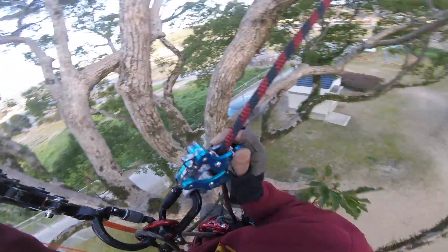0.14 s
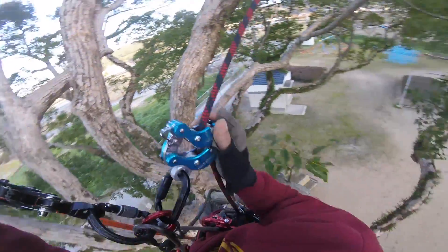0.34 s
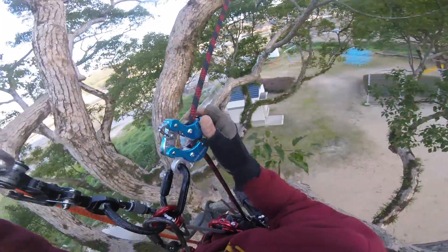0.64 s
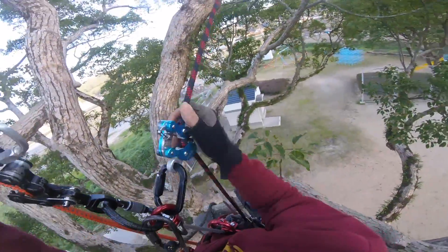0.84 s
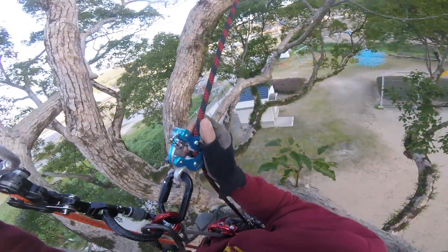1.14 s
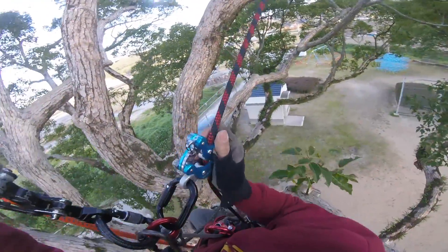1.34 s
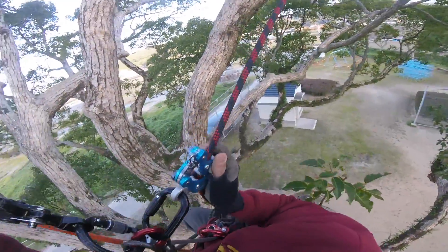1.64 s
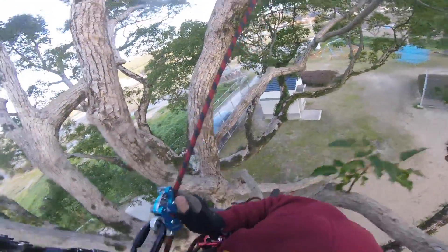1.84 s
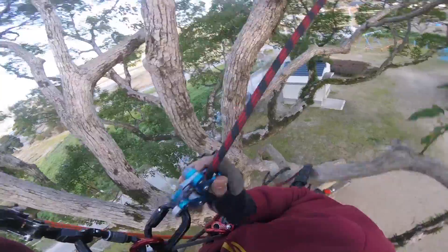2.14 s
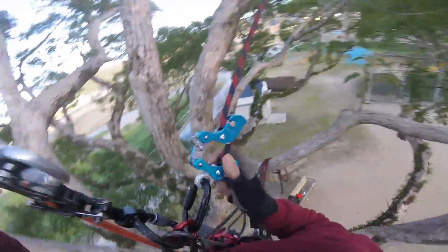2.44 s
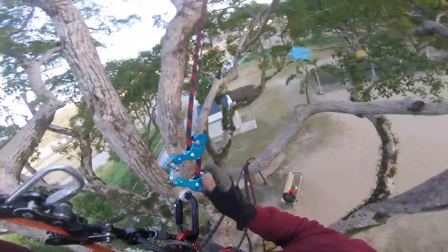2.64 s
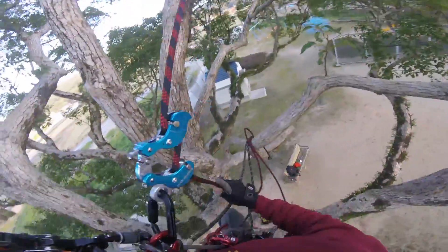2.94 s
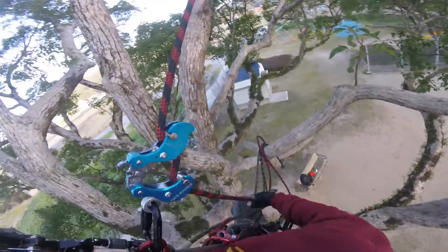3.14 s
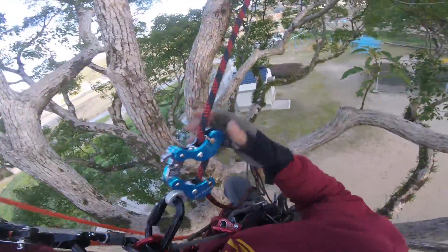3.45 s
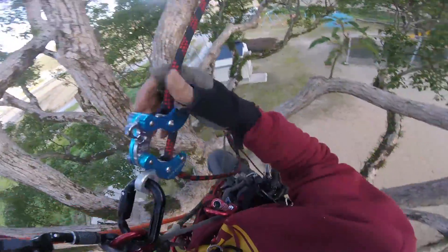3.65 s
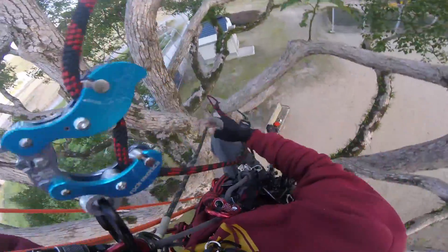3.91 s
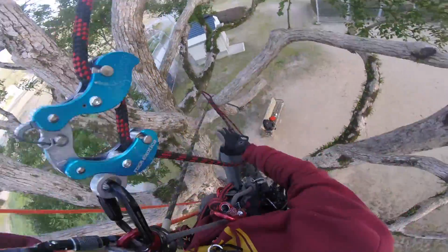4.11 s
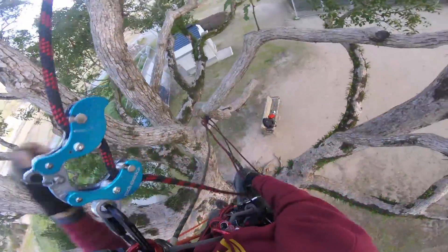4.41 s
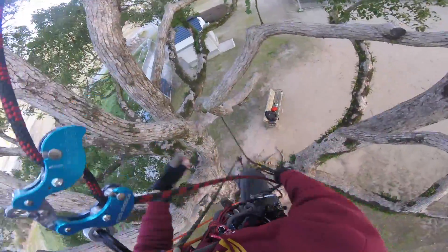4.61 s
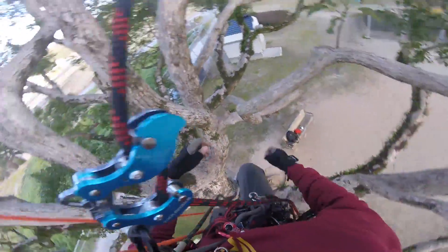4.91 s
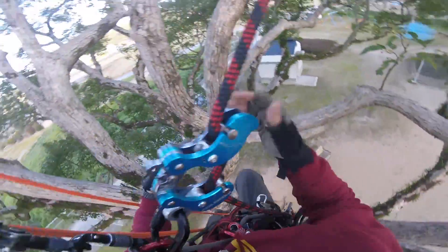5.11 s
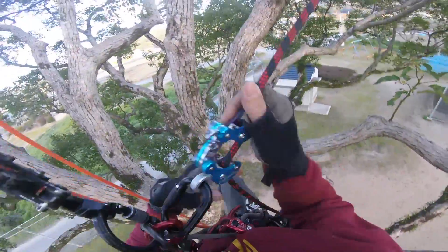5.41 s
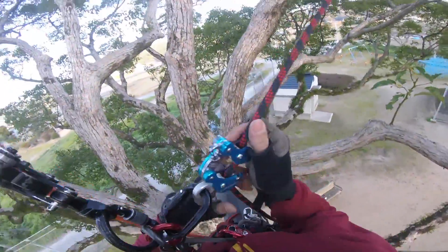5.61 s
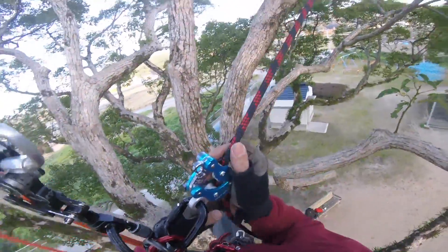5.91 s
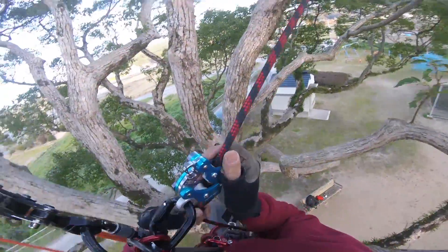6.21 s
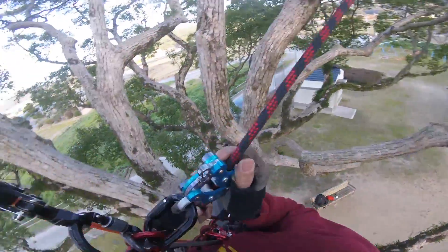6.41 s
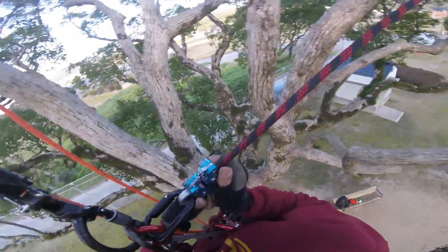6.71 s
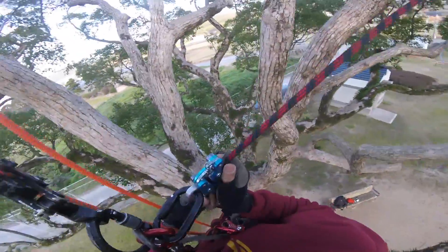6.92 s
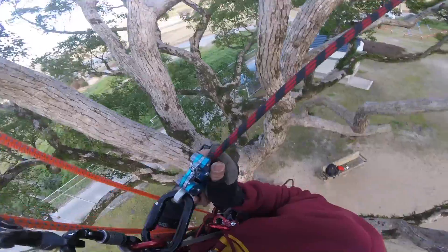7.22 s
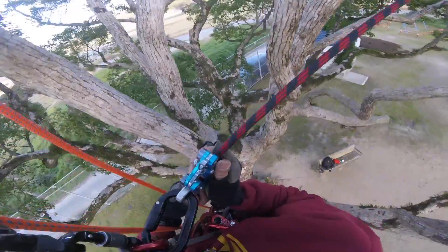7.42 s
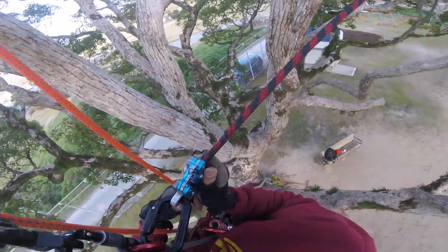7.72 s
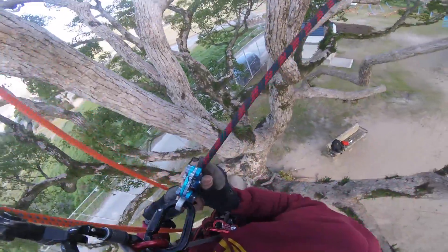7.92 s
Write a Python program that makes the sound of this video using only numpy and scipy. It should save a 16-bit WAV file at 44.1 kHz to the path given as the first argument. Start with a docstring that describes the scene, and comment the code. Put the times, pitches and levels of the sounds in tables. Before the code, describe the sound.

Bright, dry metallic clicks and clattering of carabiners on a climbing rope, with soft cloth and rope rustle, dull knocks and light wind buffeting.

```python
"""A metal rope device and its carabiners click and rattle along a rope, moved by a climber in a tree.
Principle: each contact is an impulse with a brief chatter, exciting damped modes that echo off body and limbs.
Knocks and a strap's stick-slip creak are damped modes too; rope, sleeves and hush are shaped noise.
Wind buffets the microphone of a close, sealed camera as modulated low noise and single-cycle puffs.
The camera's look-ahead limiter ducks everything around the two hardest rattles; a low-pass ends the chain."""
import sys
import numpy as np
from scipy import signal
from scipy.fft import rfft, irfft, next_fast_len
from scipy.io import wavfile
from scipy.ndimage import uniform_filter1d, minimum_filter1d, map_coordinates

SR = 44100
rng = np.random.default_rng(int(sys.argv[2]) if len(sys.argv) > 2 else 0)


def dump(signal):
    """Clip the signal to [-1, 1] and save it as 16-bit WAV at the path in sys.argv[1]."""
    limited = np.clip(np.atleast_2d(signal).T, -1, 1)
    pcm = np.round(limited * 32767).astype(np.int16)
    wavfile.write(sys.argv[1], SR, pcm)


N = 355261  # samples


def amp(db):
    """Logarithmic level: 20 dB is a factor of ten in amplitude."""
    return 10 ** (np.asarray(db) / 20)


def unit(x):
    """Normalisation to a root-mean-square of 1."""
    return x / np.sqrt(np.mean(x ** 2) + 1e-20)


def along(points, hz):
    """Interpolation of (f/Hz, value) points along a logarithmic frequency axis."""
    f, v = np.transpose(points)
    return np.interp(np.log(hz + 1), np.log(f + 1), v)


def wobble(rate):
    """Slow random modulation: a smooth curve through normal random knots, rate knots a second."""
    knots = rng.standard_normal(int(N * rate / SR) + 4)
    return map_coordinates(knots, [np.arange(N) * rate / SR])


def filtered(x, response):
    """Linear filtering: the spectrum of x times a response of frequency."""
    m = next_fast_len(N + 8192)
    spectrum = rfft(x, m) * response(np.fft.rfftfreq(m, 1 / SR))
    return irfft(spectrum, m)[..., :N]


def coloured(x, spectrum):
    """Spectral shaping: x filtered to a given colour, at rms 1."""
    return unit(filtered(x, lambda hz: amp(along(spectrum, hz))))


def curves(rows):
    """Linear interpolation in time: one value a sample for each column after t/s."""
    s, *cols = np.transpose(rows)
    return [np.interp(np.arange(N) / SR, s, c) for c in cols]


def peak(rows):
    """Normalisation of each row to peak 1."""
    return rows / np.abs(rows).max(axis=1, keepdims=True)


def ringing(modes, centre_hz, spread_hz, scatter_db, t):
    """Modal superposition: modes near each blow's centre ring most, slightly detuned by the grip."""
    hz, db, t60 = np.transpose(modes)
    chance = rng.standard_normal((len(centre_hz), 3, len(hz)))
    distance = (hz - centre_hz[:, None]) / spread_hz
    gain = amp(db + scatter_db * chance[:, 0] - 6.36 * distance ** 2)
    detuned_hz = hz * (1 + 0.0184 * chance[:, 1])
    phase = 2 * np.pi * detuned_hz[..., None] * t + 0.467 * chance[:, 2, :, None]
    decay = amp(-60 * t / t60[:, None])
    rows = np.sum(gain[..., None] * decay * np.sin(phase), axis=1)
    rows *= (1 - np.exp(-t / 0.00013)) ** 3  # the contact takes a moment to build
    return peak(rows)


def superposed(rows, start):
    """Superposition: each row is added to the signal from its own start sample."""
    where = start[:, None] + np.arange(rows.shape[1])
    return np.bincount(where.ravel(), rows.ravel(), N + SR)[:N]


# relative spectrum of the outdoor hush: f/Hz, level/dB
HUSH_SPECTRUM = [(120, -25.5), (200, -1), (231, 1), (291, -5), (651, -11.5), (711, -12.5), (1020, -13.5),
                 (1740, -20), (2120, -20), (4170, -28), (5860, -23), (6530, -17.5), (10400, -30),
                 (12600, -30), (14300, -49.5)]


def hush():
    """Random noise principle: filtered random pressure with only a slight drift in level."""
    level_db = -63.5 + 1.3 * wobble(3.06)
    return amp(level_db) * coloured(rng.standard_normal(N), HUSH_SPECTRUM)


# relative spectrum of the wind buffeting: f/Hz, level/dB
BUFFET_SPECTRUM = [(8.8, -38.5), (15, 2), (54, 1.5), (95, -8), (190, -13.5), (222, -29.5), (400, -26.5),
                   (520, -58), (880, -120)]
# wind on the microphone port: t/s, level/dB
WIND_LEVEL = [(0, -54), (.84, -53.5), (1.2, -58), (1.68, -54.5), (2.16, -57), (2.22, -40.5), (2.29, -46.5),
              (2.4, -50), (2.8, -53), (2.94, -47), (3.36, -56.5), (3.52, -52.5), (3.78, -59), (4.6, -56),
              (5.74, -54.5), (6.44, -56), (7.0, -49), (7.42, -44), (7.7, -47.5), (8.06, -56)]


def wind_buffet():
    """Turbulent pressure fluctuation: low noise in random lumps follows the wind level."""
    (level_db,) = curves(WIND_LEVEL)
    lumps = amp(1.83 * wobble(14))
    return amp(level_db) * unit(lumps * coloured(rng.standard_normal(N), BUFFET_SPECTRUM))


# relative spectrum of cloth rub: f/Hz, level/dB
RUB_SPECTRUM = [(150, -28), (300, -1), (580, -3), (950, -3.5), (1500, -8.5), (2500, -14.5), (4000, -34.5)]
# sleeves and rope in motion: t/s, cloth rub level/dB, rope rustle level/dB
MOTION_LEVELS = [(0, -66.5, -69.5), (.4, -66, -59.5), (.55, -63, -63.5), (.7, -61, -61.5),
                 (.9, -69.5, -71.5), (1.5, -74, -83.5), (1.8, -66, -58.5), (2.07, -86, -64.5),
                 (2.4, -69, -64.5), (2.94, -66.5, -67.5), (3.3, -88, -83.5), (3.46, -69.5, -75),
                 (3.62, -67, -72), (3.9, -77, -76), (4.1, -70, -68), (4.48, -80, -77), (4.64, -66, -66),
                 (5.04, -67, -75.5), (5.18, -72, -84), (5.35, -70.5, -69), (6.02, -71.5, -78),
                 (6.44, -71, -69.5), (6.58, -63, -58.5), (6.72, -89, -70), (6.9, -80, -69),
                 (7.2, -69, -65.5), (7.7, -69, -64.5), (8.06, -67, -68.5)]


def cloth_rub():
    """Friction noise: unevenly modulated noise stands for the sleeves sliding."""
    level_db, _ = curves(MOTION_LEVELS)
    strokes = amp(4.17 * wobble(40) + 2.6 * wobble(300))
    return amp(level_db) * coloured(rng.standard_normal(N) * strokes, RUB_SPECTRUM)


# relative spectrum of rope fibres, also used for the scrapes: f/Hz, level/dB
RUSTLE_SPECTRUM = [(1000, -28), (1800, -8.5), (3000, -5.5), (4100, -9.5), (5200, 2.5), (6480, -3),
                   (8000, -8), (10000, -17), (13000, -60.5)]


def rope_rustle():
    """Granular friction: clumps of tiny fibre slips form a rough noise."""
    _, level_db = curves(MOTION_LEVELS)
    clumps = amp(2.29 * wobble(35) + 1.2 * wobble(700))
    return amp(level_db) * coloured(rng.standard_normal(N) * clumps, RUSTLE_SPECTRUM)


# resonance of the microphone port in the noise: f/Hz, width/Hz, level/dB
PORT_RESONANCE = (6470, 300, 5)


def through_port(x):
    """Second-order resonance: the port lifts a narrow band of the noise."""
    centre_hz, width_hz, db = PORT_RESONANCE

    def response(f):
        damping = 1j * f * width_hz
        return 1 + (amp(db) - 1) * damping / (centre_hz ** 2 - f * f + damping)

    return filtered(x, response)


def background():
    """Linear superposition of hush, wind buffeting, cloth rub and rope rustle, heard through the port."""
    return through_port(hush() + wind_buffet() + cloth_rub() + rope_rustle())


# single puffs of wind on the port: t/s, level/dB of the envelope, f/Hz
PUFFS = [(2.246, -33, 76), (2.274, -39.5, 80), (5.973, -39.5, 130.5), (7.07, -30.5, 68), (7.347, -39, 154),
         (7.446, -32.5, 95)]


def puffs():
    """Pressure pulse: each puff pushes the diaphragm for about one cycle."""
    t = np.arange(N) / SR
    out = np.zeros(N)
    for s, db, hz in PUFFS:
        envelope = np.exp(-(2.34 * hz * (t - s)) ** 2)
        out += amp(db) * envelope * np.sin(2 * np.pi * hz * (s - t))
    return out


# short scrapes of rope through the device: start t/s, length/s, level/dB
SCRAPES = [(2.913, 0.1323, -61.5), (4.688, 0.0674, -68), (4.99, 0.0577, -61.5), (5.056, 0.0303, -65.5)]


def scrapes():
    """Sliding friction: dense, uneven grains of fibre noise while the rope runs."""
    t = np.arange(N) / SR
    stroke = np.zeros(N)
    for s, length, db in SCRAPES:
        to_nearest_end = np.minimum(t - s, s + length - t)
        stroke += amp(db) * np.clip(4 * to_nearest_end / length, 0, 1)
    grains = rng.standard_normal(N) * amp(3.2 * wobble(270))
    return stroke * coloured(grains, RUSTLE_SPECTRUM)


# a strap creaking under load, slip by slip: t/s, peak level/dB
SLIPS = [(3.362, -48), (3.452, -49), (3.469, -55.5), (3.487, -51.5), (3.501, -51.5), (3.524, -50.5),
         (3.534, -51), (3.551, -50), (3.559, -47), (3.566, -48), (3.577, -49.5), (3.591, -46.5)]
# modes of the strap: f/Hz, relative level/dB, t60/s
STRAP_MODES = [(584, 3, 0.0146), (970, -3.5, 0.0218), (2278, -4.5, 0.0107)]


def creak():
    """Stick-slip: every slip rings the strap's modes at new strengths."""
    s, db = np.transpose(SLIPS)
    t = np.arange(SR // 20) / SR
    rows = amp(db)[:, None] * ringing(STRAP_MODES, np.full(len(s), 800.), 4900, 3.65, t)
    return superposed(rows, np.round(s * SR).astype(int))


# dull knocks carried through the harness: t/s, level/dB (the decay starts 3 dB above), f/Hz, t60/s
KNOCKS = [(2.196, -37.5, 313, 0.0155), (2.343, -32.5, 367, 0.0144), (2.544, -36, 357, 0.0284),
          (4.145, -49.5, 320, 0.0268), (4.293, -36.5, 344, 0.0247), (4.825, -52, 320, 0.022),
          (4.984, -49, 620, 0.0285), (5.443, -57.5, 682, 0.029), (5.463, -43.5, 419, 0.0184)]


def knocks():
    """Damped oscillation: a single low mode with a soft onset for each knock."""
    out, t = np.zeros(N + SR), np.arange(SR // 10) / SR
    onset = 1 - np.exp(-t / 0.00121)
    for s, db, hz, t60 in KNOCKS:
        decay = amp(db + 3 - 60 * t / t60)
        out[round(s * SR):][:len(t)] += decay * np.sin(2 * np.pi * hz * t) * onset
    return out[:N]


# rattles of small loose contacts:
# start t/s, length/s, rate/(contacts per s), mean peak level/dB, ring centre f/Hz, sparkle level/dB
RATTLES = [(.15, 0.35, 30, -54, 5450, -20), (0.63, 0.0316, 140, -39.5, 6460, -19.5),
           (.684, 0.02644, 220, -43, 5660, -21), (1.743, 0.01296, 170, -25, 6200, -21.5),
           (1.772, 0.0177, 170, -23, 5600, -16.5), (1.863, 0.0205, 190, -34, 5820, -21),
           (1.916, .008, 250, -36.5, 5700, -13.5), (1.962, 0.0155, 220, -39, 6000, -21.5),
           (1.993, 0.0604, 130, -48, 5270, -26.5), (2.115, 0.0277, 180, -37.5, 5112, -20),
           (2.18, 0.0141, 250, -39.5, 5100, -21.5), (2.224, .02, 100, -42, 4900, -26.5),
           (2.32, 0.2, 25, -47.5, 5500, -22.5), (2.542, .032, 120, -39, 5850, -27.5),
           (3.246, 0.0177, 140, -33.5, 5130, -22), (3.449, 0.16, 55, -52, 5470, -18.5),
           (4.293, .006, 500, -29, 5650, -15), (4.33, .05, 60, -54.5, 5499, -20.5),
           (4.697, 0.00845, 200, -43.5, 6100, -8), (4.725, 0.073, 60, -50, 6170, -16.5),
           (4.832, .065, 60, -51, 5802, -13.5), (5.069, 0.0216, 200, -49, 6600, -1.5),
           (5.243, .17, 25, -53.5, 5556, -14), (6.515, 0.0097, 250, -24.5, 6303, -16),
           (6.531, 0.013, 250, -22.5, 6130, -13.5), (6.545, 0.016, 270, -31, 5930, -16.5),
           (6.582, .006, 170, -39, 6200, -20.5), (6.64, 0.00806, 250, -31.5, 5800, -15),
           (7.79, 0.0172, 50, -46.5, 5610, -22.5)]
LOOSE_SCATTER_DB, LOOSE_RING_SPREAD_HZ = 4, 520
LOOSE_BODY_HZ, LOOSE_BODY_SPREAD_HZ, LOOSE_BODY_DB, LOOSE_COLOUR_DB = 2734, 593, -9.5, 1
LOOSE_CONTACT_MS, LOOSE_SPREAD_MS = 1.8, .9  # how long parts chatter after the blow


def loose_contacts():
    """Random impact process: contacts scattered by chance through each rattle, as click rows plus chatter/ms."""
    rows = []
    spread = [LOOSE_SCATTER_DB, LOOSE_RING_SPREAD_HZ, LOOSE_BODY_SPREAD_HZ,
              LOOSE_COLOUR_DB, LOOSE_COLOUR_DB, LOOSE_SPREAD_MS]
    for start, length, rate, db, ring_hz, sparkle_db in RATTLES:
        when, how = rng.random(16), rng.standard_normal((16, 6))
        count = int(np.clip(round(rate * length), 1, 16))
        mean = [db, ring_hz, LOOSE_BODY_HZ, LOOSE_BODY_DB, sparkle_db, LOOSE_CONTACT_MS]
        s = start + length * (np.arange(count) + when[:count]) / count
        rows.append(np.column_stack([s, mean + spread * how[:count]]))
    return np.vstack(rows)


# distinct metal contacts, level before echoes and limiting:
# t/s, peak level/dB, ring centre f/Hz, body centre f/Hz, body level/dB, sparkle level/dB (both re ring)
CLICKS = [(0.1843, -43, 5750, 1970, -14.5, -23), (0.2404, -46, 5180, 2100, -11.5, -22),
          (0.2725, -37, 5140, 3000, -7.5, -19.5), (0.3074, -39.5, 5350, 2110, -4.5, -16.5),
          (0.371, -34, 6170, 2090, -14, -19), (0.397, -40.5, 5870, 3340, -2.5, -8),
          (0.628, -32, 6650, 3300, -9.5, -19.5), (0.632, -31, 5150, 2510, -8.5, -15.5),
          (0.6487, -36, 5870, 2330, -11, -5.5), (0.6848, -35, 5880, 3735, 1, -14),
          (0.972, -12.5, 5340, 3370, -9, -27.5), (1.276, -42, 5800, 2340, -9, -16.5),
          (1.7346, -26.5, 6430, 3020, -3.5, -14), (1.7375, -16, 6180, 3200, -10.5, -20),
          (1.7423, -20.5, 6340, 2420, -10, -25.5), (1.7555, -13, 6507, 2610, -6.5, -7.5),
          (1.7595, -2, 6643, 2390, -23.5, -17), (1.7642, -11.5, 5550, 2497, -8, -5.5),
          (1.768, -7.5, 5840, 3170, -20, -13.5), (1.7722, -10.5, 6120, 2620, -14, -16.5),
          (1.782, -22, 5500, 2210, -13.5, -23.5), (1.7965, -24, 7070, 2360, -11.5, -21.5),
          (1.8166, -19.5, 5200, 3620, -10, -19), (1.8232, -24, 6650, 2410, -18, -26.5),
          (1.853, -31, 5720, 2620, -12, -24.5), (1.8713, -18.5, 5950, 3020, -11.5, -16),
          (1.9109, -16.5, 6780, 2800, -10.5, -11.5), (1.9129, -23, 6500, 3330, 0, -5.5),
          (1.9151, -19.5, 6250, 2700, -13, -9.5), (1.9567, -24, 6250, 2610, -25.5, -32.5),
          (1.98, -19.5, 6280, 2334, -17.5, -22.5), (1.9863, -27, 5920, 2277, -13, -25.5),
          (2.0076, -37.5, 5630, 2110, -5.5, -27.5), (2.0826, -39, 5870, 3110, -2, -26),
          (2.1154, -30, 5600, 2710, -15.5, -26), (2.1252, -29, 5630, 3160, -4, -10.5),
          (2.18, -35.5, 5364, 3500, -3.5, -21), (2.2, -19, 5886, 2510, -26, -23),
          (2.283, -28.5, 5730, 2810, -8, -28.5), (2.3434, -13.5, 6420, 1811, -17.5, -22),
          (2.351, -29.5, 6020, 3100, -7, -28.5), (2.5441, -23.5, 4940, 2470, -9.5, -21.5),
          (2.546, -20, 6164, 2580, -8, -11.5), (2.7658, -22.5, 6315, 2800, -15, -20),
          (2.9709, -30, 5300, 3480, 7.5, -19), (3.257, -32.5, 5940, 2090, -6.5, -24),
          (3.5012, -44.5, 5530, 2355, 10.5, -23.5), (3.7026, -43, 5270, 2650, -6, -19.5),
          (3.7082, -40.5, 5420, 2670, -2.5, -21), (4.1321, -40.5, 5490, 2760, -8, -32),
          (4.1477, -26, 5650, 1690, -13, -38), (4.2943, -19, 5710, 2990, -14, -15),
          (4.2976, -17.5, 6220, 2519, -12.5, -16), (4.3152, -47, 5495, 1620, -4.5, -10.5),
          (4.644, -36, 7475, 1970, -14, -12), (4.853, -32.5, 5960, 1860, -17.5, -18),
          (4.9982, -43, 5630, 1720, -19, -19.5), (5.0762, -39.5, 6920, 2628, -30.5, -8.5),
          (5.444, -25, 5573, 1810, -11.5, -27.5), (5.4584, -26, 5820, 1704, -8.5, -26),
          (5.467, -32.5, 5110, 2250, -6.5, -28), (5.8349, -15.5, 5697, 2700, -5.5, -31.5),
          (6.485, -39.5, 6295, 2740, -4.5, -30), (6.491, -35, 5075, 3210, 0.5, -22),
          (6.501, -37.5, 5493, 1910, -4, -15), (6.5054, -14, 6310, 2564, -16.5, -17.5),
          (6.5071, -6.5, 5690, 2566, -15.5, -25), (6.51, 3.5, 6527, 2363, -20, -25.5),
          (6.5139, -15.5, 6092, 2590, -11.5, -15.5), (6.5228, -7.5, 6430, 2490, -8, -16.5),
          (6.5267, -13.5, 6500, 2260, -9.5, -14.5), (6.531, -21.5, 5960, 2280, -12.5, -14.5),
          (6.5434, -15.5, 5630, 3190, -14, -14.5), (6.5755, -25, 5970, 2250, -12, -19),
          (6.5783, -25, 6460, 2530, -11.5, -21.5), (6.6179, -34, 5000, 2940, -4.5, -23.5),
          (6.632, -32, 6510, 1807, -14, -24), (6.6403, -19.5, 5765, 2895, -19, -16.5),
          (6.6596, -24, 5930, 3090, -10.5, -13), (6.6835, -38.5, 5597, 2830, -3, -24.5),
          (6.7296, -32, 5920, 2260, -10, -22), (6.754, -36, 6400, 2090, -19.5, -32),
          (6.7662, -33, 6200, 2030, -7.5, -20.5), (6.8999, -32, 5490, 3234, -12.5, -18.5),
          (7.7796, -38, 4990, 2770, -11, -19.5)]
# modes of the metal parts as the housing passes them, low to high: f/Hz, relative level/dB, t60/s
BODY_MODES = [(601, -18.5, 0.0065), (895, -12.5, 0.0097), (1262, 3, 0.009), (1658, 3.5, 0.00652),
              (2205, -0.5, 0.00555), (2562, 0, 0.00486), (3150, 4.5, 0.00437), (3585, -3.5, 0.00596)]
RING_MODES = [(4546, -6.5, 0.00396), (5119, 0, 0.00622), (5791, -0.5, 0.00696), (6533, 1, 0.00589),
              (7309, -0.5, 0.00497), (8103, -6.5, 0.015)]
SPARKLE_MODES = [(8816, 4, 0.0078), (9606, 2, 0.00712), (10705, -9.5, 0.012), (11443, -4, 0.00639),
                 (13600, -18.5, 0.0055)]
CLATTER_GAP_S, CLATTER_CONTACT_MS = .006, 0.99
CONTACT_MS = .04  # a lone contact is one clean blow


def clicks():
    """Impulse excitation: a sharp blow and a chatter of micro-impacts ring three groups of modes."""
    gaps = np.diff(np.transpose(CLICKS)[0], prepend=0, append=N / SR)
    crowded = np.minimum(gaps[:-1], gaps[1:]) < CLATTER_GAP_S  # parts thrown together keep chattering
    distinct = np.column_stack([CLICKS, np.where(crowded, CLATTER_CONTACT_MS, CONTACT_MS)])
    contacts = np.vstack([distinct, loose_contacts()])
    s, db, ring_hz, body_hz, body_db, sparkle_db, ms = contacts.T
    t = np.arange(512) / SR
    chatter_s = np.clip(ms, .03, 9)[:, None] / 1000  # time for the chatter to fall 12 dB
    chatter = 0.072 * rng.standard_normal((len(s), len(t))) * amp(-12 * t / chatter_s)
    chatter[:, 0] = 1  # the blow itself

    def struck(rows):
        return peak(signal.fftconvolve(rows, chatter, axes=1))

    rows = struck(ringing(RING_MODES, ring_hz, 964, 2.3, t))
    rows += amp(body_db)[:, None] * struck(ringing(BODY_MODES, body_hz, 641, 1.7, t))
    sparkle_hz = np.full(len(s), 9500.)
    rows += amp(sparkle_db)[:, None] * struck(ringing(SPARKLE_MODES, sparkle_hz, 3000, 6, t))
    start = np.round((s - .0002) * SR).astype(int)  # the contact starts just before it is loud
    return superposed(amp(db)[:, None] * peak(rows), start)


# decay of the echoes off the body and limbs: f/Hz, t60/s
ECHO_DECAY = [(500, .022), (3000, 0.07), (6000, 0.0584), (12000, 0.0061)]
ECHO_DB = -24


def branches(x):
    """Diffuse reflection: a short noise tail, decaying at its own rate in each band, answers the gear."""
    hz, t, z = signal.stft(rng.standard_normal(SR // 5), SR, nperseg=128)
    decay = amp(-60 * t / along(ECHO_DECAY, hz)[:, None])
    tail = signal.istft(z * decay, SR, nperseg=128)[1]
    delayed = np.pad(x, (45, 0))  # samples, about 1 ms
    return signal.fftconvolve(delayed, tail / np.linalg.norm(tail))[:N]


def scene():
    """Linear superposition at the microphone: background, softer sources, then gear and its echoes."""
    surroundings = background() + puffs() + scrapes() + creak() + knocks()
    gear = clicks()
    return (surroundings + gear + amp(ECHO_DB) * branches(gear))[None]


CEILING_DB, LOOK_AHEAD_S = -8.5, .057


def limiter(x, fast_db_s, slow_db_s, slow_share):
    """Look-ahead gain control: the cut precedes each peak; part of it returns fast, the rest slowly."""
    excess = np.maximum(20 * np.log10(np.abs(x) + 1e-9) - CEILING_DB, 0)
    ahead = int(LOOK_AHEAD_S * SR)
    padded = np.pad(excess, (0, ahead))
    running_max = -minimum_filter1d(-padded, size=ahead + 441)
    held = running_max[ahead // 2 - 220:][:N]
    t = np.arange(N) / SR

    def release(cut, rate):
        return np.maximum.accumulate(cut + rate * t) - rate * t

    cut = np.maximum(release(held, fast_db_s), release(slow_share * held, slow_db_s))
    return x * amp(-uniform_filter1d(cut, size=200))


TOP_HZ = 14400


def record(dry):
    """Band limitation: the camera limits its peaks and keeps nothing above its top frequency."""
    limited = limiter(dry[0], fast_db_s=94.5, slow_db_s=2, slow_share=0.768)
    return filtered(limited, lambda hz: hz < TOP_HZ)[None]


dry = scene()
out = record(dry)
dump(out)
```